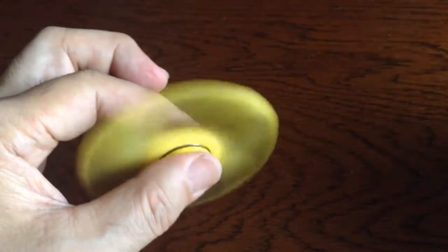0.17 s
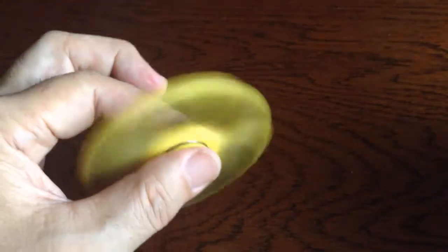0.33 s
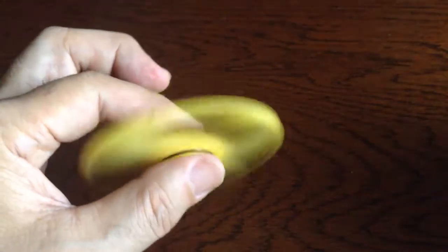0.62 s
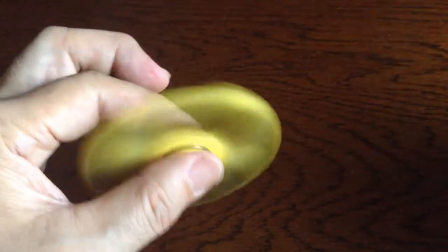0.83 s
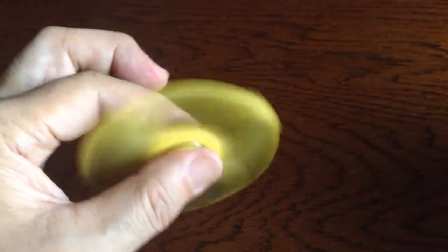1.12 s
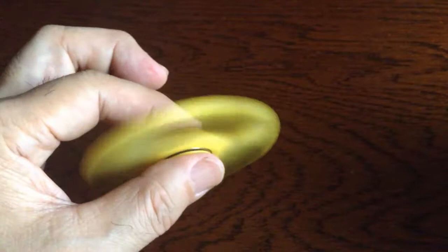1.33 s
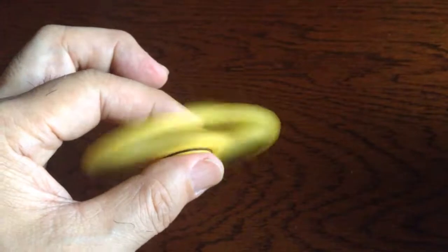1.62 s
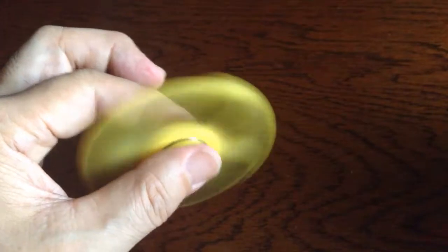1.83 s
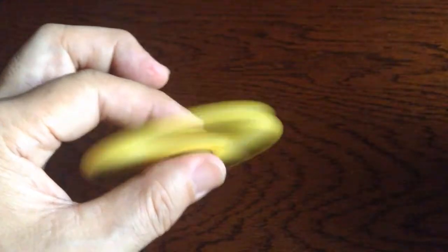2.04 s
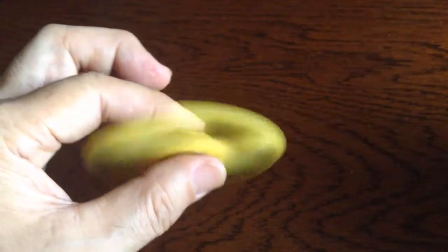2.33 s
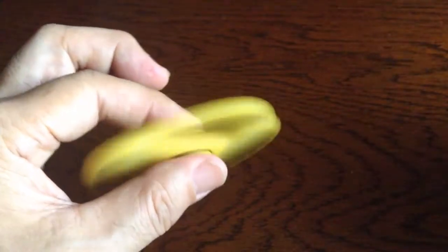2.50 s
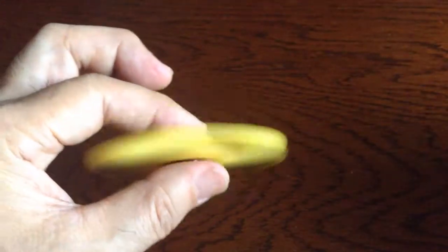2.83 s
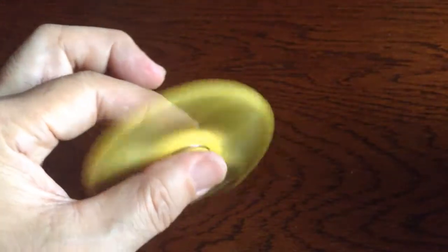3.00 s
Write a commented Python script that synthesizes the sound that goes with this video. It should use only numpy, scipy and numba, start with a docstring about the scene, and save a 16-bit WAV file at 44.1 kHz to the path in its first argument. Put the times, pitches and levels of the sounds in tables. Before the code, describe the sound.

Close, thin metallic whir of a hand-held spinner's dry ball bearing, bright, gritty and continuously rattling.

```python
"""Rolling contact in a spinning ball bearing

A plastic fidget spinner turns between finger and thumb, close by in a quiet room.
Its dry ball bearing is a dense random train of tiny impacts that excites resonances of races, cage and plastic.
Flurries of chatter, scraping and rattling swell over the rolling; grit ticks, brief wavering tones and a faint hum join.
A close reflection and drifting notches shift the colour of the hiss; a short echo, still air and faint tones follow."""
import sys
import numpy as np
from scipy import signal
from scipy.fft import rfft, irfft
from scipy.io import wavfile
from scipy.ndimage import map_coordinates
from numba import njit

SR = 44100
rng = np.random.default_rng(int(sys.argv[2]) if len(sys.argv) > 2 else 0)


def unload_wav(signal):
    """Save mono or channel-first audio to the path in sys.argv[1] as 16-bit WAV at rate SR, clipped to [-1, 1]."""
    wavfile.write(
        sys.argv[1],
        SR,
        np.round(np.clip(np.atleast_2d(signal).T, -1, 1) * 32767).astype(np.int16),
    )


N = 139356

# Rotation of the spinner. Each row: time in seconds, speed in turns per second.
SPIN_SPEED = [(0, 36.6), (1.5, 19), (3.16, 23)]
# Steady rolling before each part's offsets.
# Each row: time in seconds, races in dB, cage in dB, body in dB.
ROLLING_LEVELS = [(0, -50, -51.5, -67), (.25, -49, -58, -68), (.6, -48, -57, -69.5),
                  (.76, -49.5, -56.5, -69), (1.2, -48.5, -58, -68), (1.6, -51.5, -58, -69),
                  (1.71, -53, -59.5, -69), (1.78, -48.5, -55.5, -73.5), (2, -50.5, -58.5, -68),
                  (2.4, -47.5, -56.5, -71), (2.47, -56, -59, -67.5), (2.55, -49.5, -54, -73.5),
                  (2.7, -45.5, -57, -68), (2.79, -51, -60, -75.5), (2.95, -53.5, -57.5, -67.5),
                  (3.16, -50.5, -59.5, -73.5)]
# Balls chattering in the races, before the chatter gain.
# Each row: middle in seconds, nominal length in seconds, outer race in dB, inner race in dB.
CHATTER_FLURRIES = [(0.009, 0.008, -50, -49), (0.069, 0.0046, -42, -41), (0.085, 0.0085, -43, -61),
                    (0.109, 0.005, -41, -62), (0.118, 0.004, -55.0, -52), (0.16, 0.0091, -39.5, -50),
                    (0.199, 0.005, -38, -72), (0.235, 0.0069, -46, -90.0), (0.277, 0.0086, -41, -60),
                    (0.288, 0.0046, -43, -88), (0.335, 0.0042, -48.5, -53.0), (0.356, 0.0064, -41, -55),
                    (0.364, 0.0044, -42, -65), (0.376, 0.004, -46.0, -42), (0.408, 0.012, -40, -59),
                    (0.429, 0.0073, -45.5, -65), (0.443, 0.0071, -43.5, -76.0), (0.463, 0.0067, -39, -61),
                    (0.497, 0.0087, -38, -55.5), (0.512, 0.004, -37, -68), (0.538, 0.0062, -42, -63),
                    (0.553, 0.0026, -39, -66.5), (0.597, 0.0031, -41, -64), (0.62, 0.0037, -44.0, -61),
                    (0.64, 0.005, -51, -59), (0.655, 0.0032, -51, -65.0), (0.67, 0.004, -46.5, -58),
                    (0.7, 0.0081, -51, -50.0), (0.789, 0.012, -43, -80), (0.807, 0.0083, -46.0, -58),
                    (0.884, 0.0065, -46, -58.5), (0.895, 0.0037, -42, -55.5), (0.933, 0.005, -39, -58.5),
                    (0.96, 0.005, -46, -51), (0.982, 0.0043, -50, -49), (1.003, 0.0033, -47, -60.5),
                    (1.01, 0.0025, -41.5, -57), (1.097, 0.0038, -45.5, -66), (1.145, 0.0045, -47, -46),
                    (1.159, 0.0075, -41, -57.0), (1.185, 0.016, -44, -74.5), (1.211, 0.005, -41, -47),
                    (1.27, 0.0046, -57, -90.0), (1.327, 0.0035, -53.0, -47), (1.36, 0.0063, -42, -59),
                    (1.383, 0.011, -46, -46), (1.412, 0.0073, -42.5, -50), (1.445, 0.0041, -42.5, -61),
                    (1.466, 0.0039, -49, -48), (1.504, 0.008, -65, -51), (1.594, 0.006, -43, -59),
                    (1.757, 0.0045, -38, -42), (1.773, 0.011, -44.0, -60.5), (1.803, 0.007, -42, -45),
                    (1.89, 0.0058, -40, -56), (1.904, 0.008, -44, -65), (1.928, 0.01, -41.5, -55.5),
                    (1.955, 0.013, -46, -57), (1.974, 0.0051, -43, -70), (2.008, 0.005, -56, -51.0),
                    (2.035, 0.0058, -48.0, -70), (2.103, 0.0052, -64, -55), (2.162, 0.0052, -48.0, -59.5),
                    (2.253, 0.015, -41.5, -56.0), (2.277, 0.0034, -44, -58.0), (2.312, 0.004, -45, -59),
                    (2.345, 0.004, -40, -58), (2.36, 0.005, -47, -57), (2.382, 0.0052, -47, -66),
                    (2.415, 0.0074, -58, -63), (2.431, 0.005, -44.5, -59), (2.533, 0.0055, -51, -39.5),
                    (2.574, 0.0043, -47, -46), (2.643, 0.01, -59, -49.0), (2.691, 0.005, -41, -63),
                    (2.716, 0.0049, -46, -70), (2.745, 0.0044, -44.5, -94), (2.854, 0.0042, -48.5, -55.5),
                    (2.909, 0.0044, -53, -50), (2.931, 0.0056, -51, -90.0), (2.956, 0.0045, -65, -45),
                    (3.027, 0.0096, -47.0, -58), (3.054, 0.012, -48.5, -48), (3.101, 0.0077, -42.5, -57.0)]
# Scrapes of the cage, before the scrape gain.
# Each row: middle in seconds, nominal length in seconds, level in dB.
CAGE_SCRAPES = [(0.004, 0.015, -48.5), (0.103, 0.019, -51.5), (0.151, 0.02, -50.5), (0.373, 0.039, -51),
                (0.496, 0.011, -53.5), (0.542, 0.01, -54), (0.679, 0.013, -56), (0.879, 0.013, -52),
                (1.033, 0.01, -52), (1.159, 0.021, -57), (1.254, 0.01, -49), (1.366, 0.018, -49.5),
                (1.468, 0.0062, -58), (1.844, 0.013, -51.5), (1.925, 0.0056, -54), (1.951, 0.0088, -49.5),
                (2.034, 0.012, -54.5), (2.08, 0.0066, -54), (2.146, 0.025, -51.5), (2.235, 0.0074, -56),
                (2.256, 0.013, -51), (2.309, 0.0075, -56), (2.346, 0.0054, -46.5), (2.454, 0.01, -53),
                (2.523, 0.023, -61), (2.553, 0.0057, -54), (2.617, 0.011, -51), (2.664, 0.0078, -48),
                (2.906, 0.013, -48)]
# Rattles of the bearing in the plastic body, before the rattle gain.
# Each row: middle in seconds, nominal length in seconds, level in dB.
BODY_RATTLES = [(0.078, 0.012, -62.5), (0.105, 0.016, -65), (0.153, 0.012, -59.5), (0.199, 0.0089, -61.5),
                (0.421, 0.011, -63), (0.679, 0.018, -63), (0.786, 0.014, -64.5), (0.937, 0.011, -62.5),
                (1.063, 0.015, -64), (1.366, 0.01, -62.5), (1.53, 0.01, -69), (1.577, 0.0091, -66),
                (1.776, 0.017, -64), (1.842, 0.028, -68), (2.078, 0.0096, -72), (2.21, 0.0097, -67.5),
                (2.253, 0.013, -67), (2.522, 0.0088, -69), (2.583, 0.021, -64.5), (3.026, 0.024, -68.5),
                (3.116, 0.01, -64.5)]
# Single hard ticks, before the tick gain.
# Each row: time in seconds, force on the cage in dB, force on the races in dB.
HARD_TICKS = [(0.0872, -44.5, -45), (0.0995, -42, -48.5), (0.1416, -53, -59), (0.3563, -45.5, -49),
              (0.3705, -46, -60), (0.4951, -46, -47), (0.542, -54, -36), (0.6384, -47.5, -48),
              (0.6763, -43, -41.5), (0.6957, -45.5, -39), (0.8769, -49, -34.5), (0.9108, -57, -43),
              (0.9984, -64, -42.0), (1.0327, -53, -53), (1.141, -54, -45), (1.1567, -46.5, -39),
              (1.403, -48, -62), (1.4658, -49.5, -44.5), (1.5993, -57, -43), (1.7022, -49.5, -56.5),
              (1.8448, -51, -54), (1.896, -59, -41), (1.9234, -46.5, -51.0), (1.981, -57, -49.5),
              (2.037, -48, -47), (2.0789, -42.5, -53.5), (2.3078, -47, -56.5), (2.3431, -47.5, -41.0),
              (2.4566, -55, -56.5), (2.5236, -46.0, -60), (2.5524, -51, -46), (2.615, -49, -49.5),
              (2.6624, -50, -55), (2.8169, -46.5, -49.5), (2.8983, -48, -45), (2.9108, -49, -39),
              (2.9456, -64, -52), (3.0543, -60, -51.0)]
# Brief wavering tones from rolling or a scrape, before their common gain.
# Each row: middle in seconds, nominal length in seconds, mean pitch in Hz, level in dB.
BRIEF_TONES = [(0.096, 0.027, 6650, -53), (0.16, 0.083, 1663, -77.5), (.2, 0.023, 2300, -70),
               (0.346, .05, 1862, -80), (0.427, 0.034, 1846, -75.5), (0.52, 0.042, 1528, -77),
               (.68, .035, 5780, -57), (.685, 0.034, 6500, -59), (0.794, 0.022, 2137, -74),
               (0.793, 0.017, 1540, -70), (0.86, 0.056, 1464, -77), (0.879, .025, 6170, -57.5),
               (0.94, 0.012, 1585, -67), (0.932, 0.018, 1750, -74), (1.05, 0.11, 1545, -80),
               (1.145, 0.081, 1523, -75), (1.216, 0.034, 1857, -79), (1.764, 0.042, 1841, -76),
               (1.83, 0.062, 1550, -78), (1.846, 0.017, 5640, -53), (1.88, 0.04, 1534, -80),
               (1.952, 0.017, 4780, -59), (2.08, .03, 6700, -60), (2.165, .04, 1571, -73),
               (2.254, 0.018, 3230, -63.5), (2.313, 0.029, 1539, -78), (2.367, 0.032, 6700, -58),
               (2.517, 0.022, 7800, -50), (2.54, .04, 6630, -56), (2.66, 0.051, 1571, -75.5),
               (2.72, 0.024, 1561, -75.5), (2.9, 0.021, 7420, -54), (3.115, 0.019, 1566, -74.5)]

# Resonances of each part. Each row: frequency in Hz, nominal width in Hz, relative level in dB.
OUTER_RACE_MODES = [(12210, 343, -4), (12300, 450, -8), (12740, 310, -4.5), (13290, 334, 3.5),
                    (13640, 1400, -12.5)]
INNER_RACE_MODES = [(13760, 220, -6), (14560, 610, -6), (15300, 390, 0.5)]
BALL_CAGE_MODES = [(4849, 234, -1), (5280, 590, -7), (5870, 560, -6.5), (6075, 150, 3), (6960, 850, -2),
                   (7230, 490, -4.5), (7657, 530, 0), (8710, 1400, -5), (9760, 1100, -6.5),
                   (10710, 800, -9)]
PLASTIC_BODY_MODES = [(2047, 350, -18.5), (2530, 270, -6), (2676, 105, 2), (3100, 383, -0.5),
                      (3465, 410, 1.5), (3850, 870, -3.5)]
PLASTIC_ARM_MODES = [(1434, 23, -3.5), (1560, 42, -2.5), (1713, 140, -5), (1849, 76, -1.5)]

# Drifting notches in the spinner's tone.
# Each row: mean frequency in Hz, width in Hz halved between two notches, rms wander in Hz.
TONE_HOLLOWS = [(4317, 240, 140), (6420, 110, 110), (11290, 420, 170)]
# Colour of the rolling hum. Each row: frequency in Hz, relative density in dB per Hz.
HUM_COLOUR = [(25, -68), (50, -39), (90, -25), (150, -5.5), (180, -3), (203, 0.5), (225, 2.5), (260, -2),
              (340, -16.5), (600, -27), (1500, -37), (16000, -104)]
# Strength of the hum. Each row: time in seconds, rms level in dB.
HUM_STRENGTH = [(0, -89), (.62, -85.5), (.685, -75), (.74, -83), (.95, -81), (1.11, -91), (1.3, -85.5),
                (1.4, -88), (1.49, -79), (1.6, -89.5), (1.75, -82.5), (1.9, -89), (3.16, -85.5)]
# Colour of the room air. Each row: frequency in Hz, relative density in dB per Hz.
AIR_COLOUR = [(20, -46), (45, -45), (75, -7), (140, 1.5), (300, 5), (600, 1), (1200, -2.5), (3000, -5.5),
              (16000, -10.5)]
# Steady tones of the room. Each row: frequency in Hz, rms level in dB.
STEADY_TONES = [(100, -100), (200, -95), (517, -100)]

SKIRT = 1.372  # exponent: how steeply a resonance falls away
IMPACTS_PER_S = 3400
SHARED = 0.41  # power share of the impacts that reach all parts at once
CHATTER_DB, SCRAPE_DB, RATTLE_DB, TICK_DB = -0.5, -0.5, 5, 1.5  # gains on the tables above
OUTER_DB, INNER_DB = -3.5, -8  # each race against the rolling level of the races
ARM_DB = -86  # the arms' steady low ring, before its random swings
TURN_SWING_DB = 1  # amplitude of the load's swing, once a turn
PASSES_PER_TURN, PASS_SWING_DB, PASS_SLIP = 2.8, 2, 0.51  # balls crossing the loaded spot; rms slip in cycles
CRACKLES_PER_S, CRACKLE_DB, CRACKLE_SPREAD_DB = 260, -66.5, 6.5  # fine dust in the tracks
GLANCE_DB, GLANCE_LAG_S, GLANCE_SWAY_S = -10.5, 0.0007945, .00009  # reflection off the fingers; rms sway
ROOM_DB, ROOM_T60_S, AIR_DB = -11, .25, -77.5
TOP_HZ = 15270  # edge of the steep treble cut


def bearing():
    """Modal excitation: load-modulated impacts drive the resonances of every part of the bearing and body."""
    turns = np.cumsum(curve(SPIN_SPEED)[0]) / SR
    load = undb(TURN_SWING_DB * np.cos(2 * np.pi * turns) + 1.1 * walk(70))
    passes = PASSES_PER_TURN * turns + PASS_SLIP * walk(45)
    passing_db = PASS_SWING_DB * np.cos(2 * np.pi * passes)
    race_db, cage_db, body_db = curve(ROLLING_LEVELS)
    shared = impacts(scatter_db=4.5)

    def part(modes, roll_db, bursts, wander_db, flutter_db, flare_db):
        """Superposition of modes: one contact force drives each, with its own random emphasis."""
        rolling = undb(roll_db + wander_db * walk(95)) * load
        own = impacts(scatter_db=2.5)
        stream = rolling * (np.sqrt(SHARED) * shared + np.sqrt(1 - SHARED) * own)
        flutter = unit(undb(flutter_db * np.tanh(walk(1400))))
        force = (stream + bursts * impacts(scatter_db=1.5)) * flutter
        energy = np.array([undb(db) ** 2 * width for hz, width, db in modes])
        amplitudes = np.sqrt(energy / energy.sum())
        total = 0
        for k, (mode, amplitude) in enumerate(zip(modes, amplitudes)):
            flare = unit(undb(flare_db * np.tanh(walk(110))))
            # successive modes alternate in sign
            total = total + (-1) ** k * amplitude * ring(force * flare, [mode])
        return total

    chatter = np.array(CHATTER_FLURRIES)
    outer_bursts = undb(CHATTER_DB) * flurries(chatter[:, [0, 1, 2]], edge=1.7)
    inner_bursts = undb(CHATTER_DB) * flurries(chatter[:, [0, 1, 3]], edge=3.0)
    scrapes = undb(SCRAPE_DB) * flurries(CAGE_SCRAPES, edge=1.4)
    rattles = undb(RATTLE_DB) * flurries(BODY_RATTLES, edge=0.72)
    outer = part(OUTER_RACE_MODES, race_db + OUTER_DB + passing_db, outer_bursts,
                 wander_db=0.5, flutter_db=3.5, flare_db=4.5)
    inner = part(INNER_RACE_MODES, race_db + INNER_DB + passing_db / 2, inner_bursts,
                 wander_db=1.5, flutter_db=5.5, flare_db=5.0)
    cage = part(BALL_CAGE_MODES, cage_db, scrapes, wander_db=0.56, flutter_db=1.0, flare_db=4.0)
    body = part(PLASTIC_BODY_MODES, body_db, rattles, wander_db=0.7, flutter_db=3.5, flare_db=4.0)
    arms = part(PLASTIC_ARM_MODES, ARM_DB, 0, wander_db=3.0, flutter_db=2.5, flare_db=2.5)
    return outer + inner + cage + body + arms


def grit(rise_s=0.0005, decay_s=0.0015):
    """Impulsive excitation: specks give short noise bursts and dust a crackle, ringing cage, races and body."""
    t = np.arange(N) / SR

    def push(column):
        """Contact force: one-way dust impulses plus ticks of random-sign noise."""
        sizes = undb(CRACKLE_SPREAD_DB * np.minimum(rng.exponential(size=N), 3))
        crushed = rng.random(N) < CRACKLES_PER_S / SR
        dust = undb(CRACKLE_DB) * unit(crushed * sizes)
        ticks = 0
        for row in HARD_TICKS:
            slope = np.maximum((row[0] - t) / rise_s, (t - row[0]) / decay_s)
            ticks = ticks + undb(row[column]) * np.exp(-slope)
        return dust + undb(TICK_DB) * ticks * np.sign(rng.standard_normal(N))

    cage, races = push(column=1), push(column=2)
    sound = ring(cage, BALL_CAGE_MODES) + ring(races, OUTER_RACE_MODES + INNER_RACE_MODES)
    sound = sound + undb(-16) * ring(cage, PLASTIC_BODY_MODES)
    return signal.sosfilt(signal.butter(2, 1900, "high", fs=SR, output="sos"), sound)


def brief_tones(waver=.021, rough_db=3.5, level_db=-2.5):
    """Brief wavering tones: rolling or a scrape excites one narrow pitch, with random pitch and amplitude."""
    total = 0
    for at, length, hz, db in BRIEF_TONES:
        swell = flurries([(at, length, db)], edge=1.5)
        roughness = unit(undb(rough_db * walk(300)))
        cycles = np.cumsum(hz * (1 + waver * walk(400))) / SR
        total = total + swell * np.sqrt(2) * roughness * np.sin(2 * np.pi * cycles)
    return undb(level_db) * total


def glance(x):
    """Comb interference: a close reflection with a swaying delay shifts bright and dull patches."""
    lag = GLANCE_LAG_S + GLANCE_SWAY_S * walk(28)
    gain = undb(GLANCE_DB)
    reflected = map_coordinates(x, [np.arange(N) - lag * SR], order=5)
    return (x + gain * reflected) / np.hypot(1, gain)


def hollow(x):
    """Destructive interference: narrow bands cancel between the parts and drift with the hand's tilt."""
    for hz, width, wander in TONE_HOLLOWS:
        centre = hz + wander * walk(6.7)
        x = notch(notch(x, centre, width / 2), centre, width / 2)
    return x


def hum():
    """Structure-borne sound: rolling carried by the hand, as low coloured noise of varying level."""
    return undb(curve(HUM_STRENGTH)[0]) * noise(HUM_COLOUR)


def room(x):
    """Diffuse reverberation: an exponentially decaying noise response, with still air and faint tones."""
    t = np.arange(N) / SR
    decay = np.exp(-np.log(1000) * t / ROOM_T60_S)
    tail = rng.standard_normal(N) * decay * (t > .002)
    echo = signal.fftconvolve(x, tail / np.linalg.norm(tail))[:N]
    tones = sum(np.sqrt(2) * undb(db) * np.sin(2 * np.pi * (hz * t + rng.random()))
                for hz, db in STEADY_TONES)
    return undb(ROOM_DB) * echo + undb(AIR_DB) * noise(AIR_COLOUR) + tones


def undb(db):
    """Decibel definition: amplitude ratio of a level in dB."""
    return 10 ** (np.asarray(db) / 20)


def unit(x):
    """Normalisation: scale to rms 1."""
    return x / np.sqrt(np.mean(x ** 2))


def walk(rate):
    """Random modulation of rms 1: rate values a second joined by lines; after 4096 values the last holds."""
    steps = rng.standard_normal(4096)
    return unit(np.interp(np.arange(N) / SR * rate, np.arange(len(steps)), steps))


def curve(rows):
    """Linear interpolation: every column of a time table joined by straight lines."""
    times, *cols = np.array(rows).T
    return [np.interp(np.arange(N) / SR, times, c) for c in cols]


def noise(points):
    """Spectral shaping: white noise given a (Hz, dB) colour and rms 1."""
    hz, db = np.array(points).T
    f = np.maximum(np.fft.rfftfreq(N, 1 / SR), 1)
    gain = undb(np.interp(np.log(f), np.log(hz), db))
    return unit(irfft(rfft(rng.standard_normal(N)) * gain, N))


def ring(x, modes, size=4096):
    """Minimum-phase resonance: a causal unit-energy response whose power spectrum sums the modes."""
    f = np.fft.rfftfreq(size, 1 / SR)
    power = sum(undb(db) ** 2 / (1 + (2 * (f - hz) / width) ** 2) ** SKIRT for hz, width, db in modes)
    # folding the cepstrum onto positive times makes the response causal
    cepstrum = irfft(np.log(power) / 2)
    cepstrum[1:size // 2] *= 2
    cepstrum[size // 2 + 1:] = 0
    response = irfft(np.exp(rfft(cepstrum)))
    return signal.oaconvolve(x, response / np.linalg.norm(response))[:N]


def impacts(scatter_db):
    """Shot noise: a random train of tiny impulses of uneven size and sign, rms 1."""
    hit = rng.random(N) < IMPACTS_PER_S / SR
    sign = np.sign(rng.standard_normal(N))
    size = undb(scatter_db * np.clip(rng.standard_normal(N), -2, 2))
    return unit(hit * sign * size)


def flurries(rows, edge):
    """Amplitude envelope: each flurry swells and dies round its middle; a higher edge flattens the top."""
    t = np.arange(N) / SR
    return sum(undb(db) * np.exp(-np.abs((t - at) / (0.63 * length)) ** edge) for at, length, db in rows)


@njit
def notch(x, hz, width):
    """State-variable filter: subtracting the band-pass output leaves a notch with a moving centre."""
    y, band, low = np.empty(len(x)), 0., 0.
    for i in range(len(x)):
        g = np.tan(np.pi * hz[i] / SR)
        k = np.pi * width / SR * (g + 1 / g)
        v = (band + g * (x[i] - low)) / (1 + g * (g + k))
        band, low, y[i] = 2 * v - band, low + 2 * g * v, x[i] - k * v
    return y


def scene():
    """Superposition: the spinner with its reflection and notches, its brief tones and hum, and the room."""
    contacts = hollow(glance(bearing() + grit()))
    spinner = contacts + brief_tones() + hum()
    return (spinner + room(spinner))[None]


def record(dry):
    """Band limiting: a high-pass thins the deep bass and an elliptic low-pass cuts the top steeply."""
    thin = signal.sosfilt(signal.butter(2, 60, "high", fs=SR, output="sos"), dry)
    return signal.sosfilt(signal.ellip(12, .2, 80, TOP_HZ, fs=SR, output="sos"), thin)


dry = scene()
out = record(dry)
unload_wav(out)
```